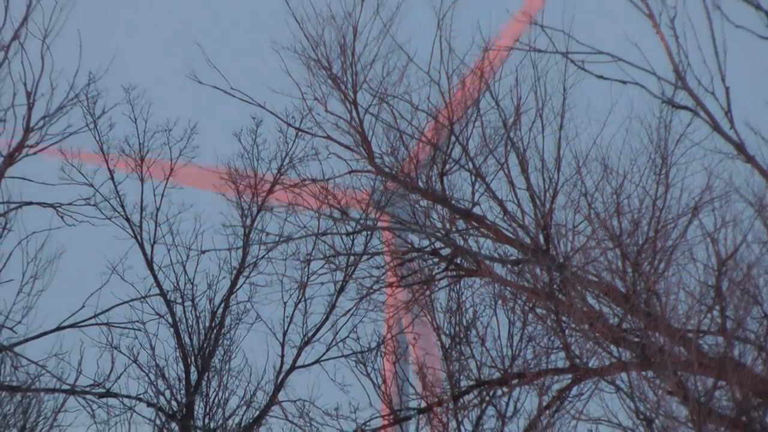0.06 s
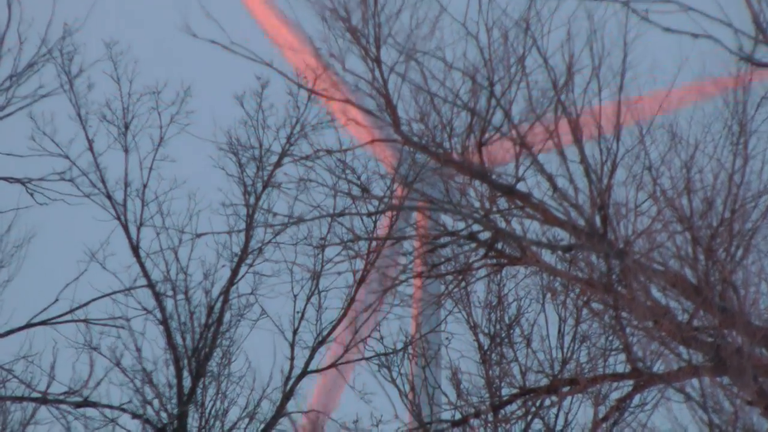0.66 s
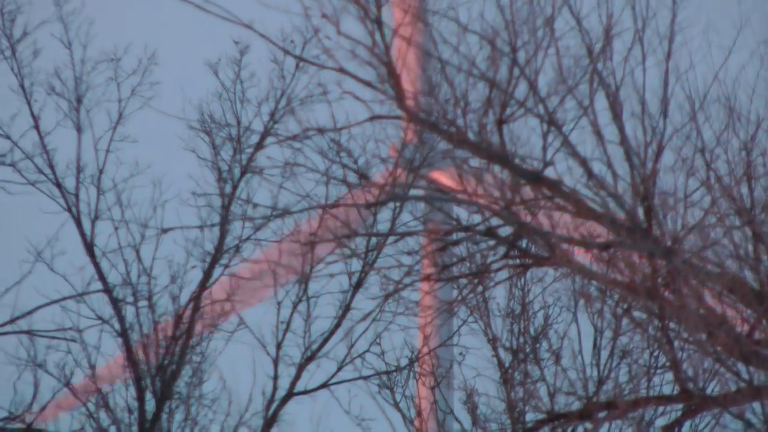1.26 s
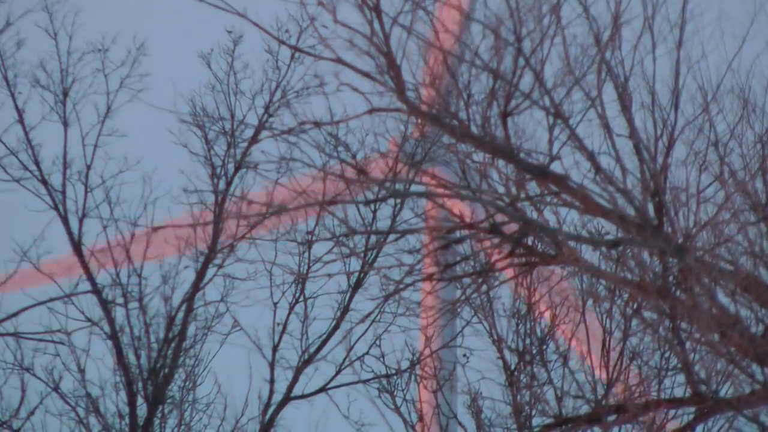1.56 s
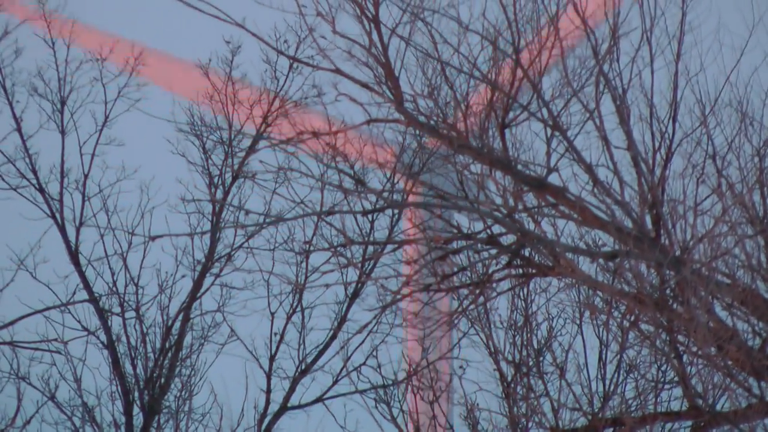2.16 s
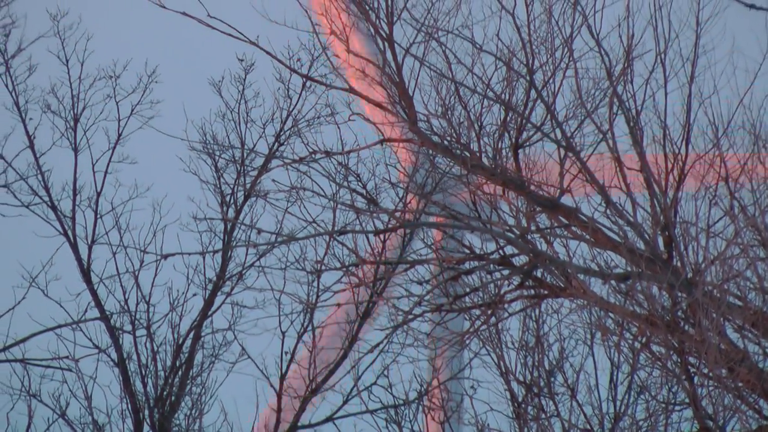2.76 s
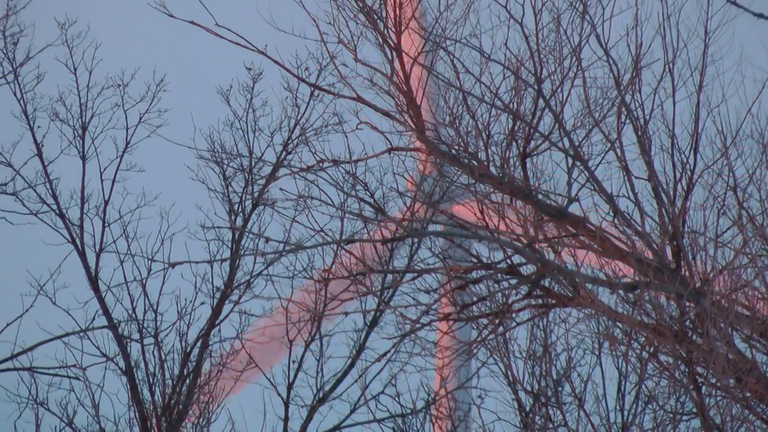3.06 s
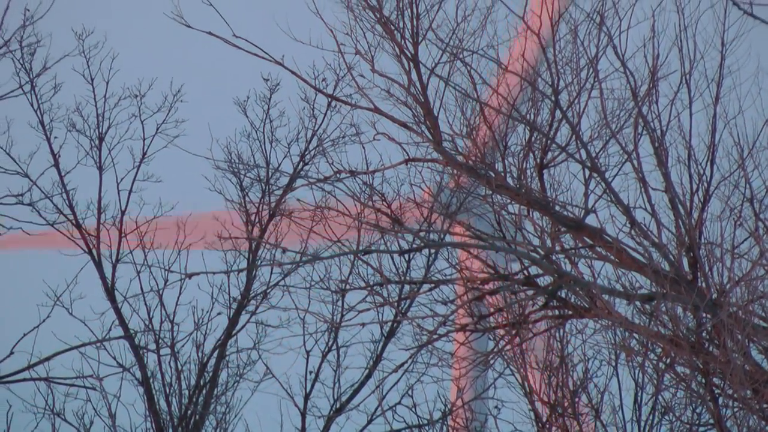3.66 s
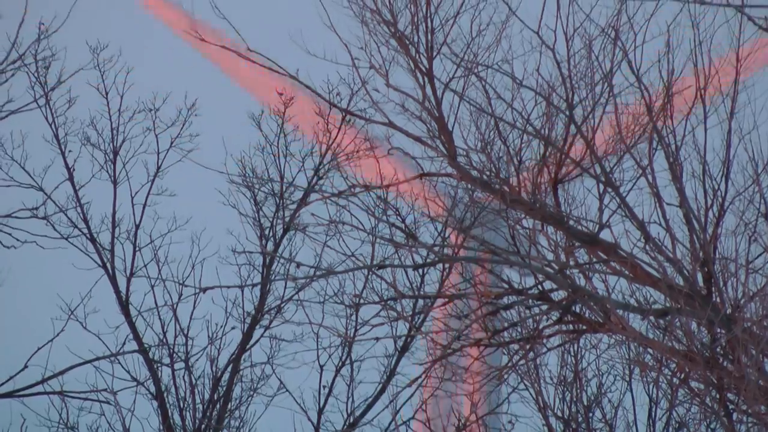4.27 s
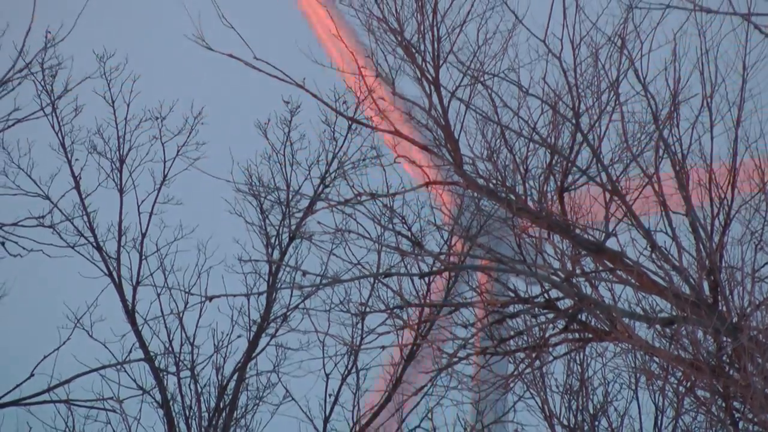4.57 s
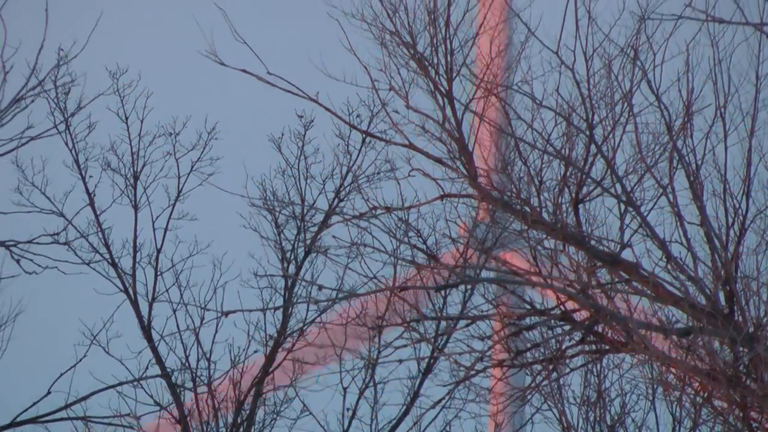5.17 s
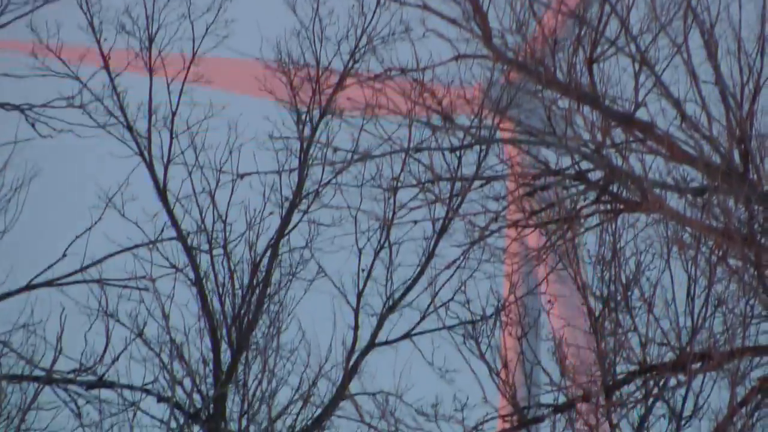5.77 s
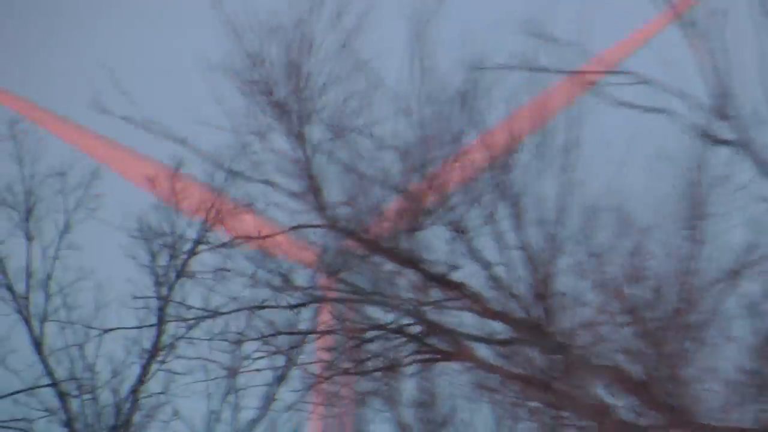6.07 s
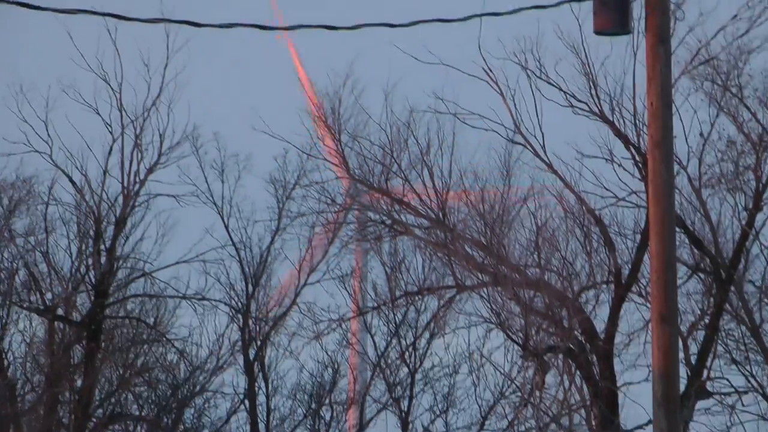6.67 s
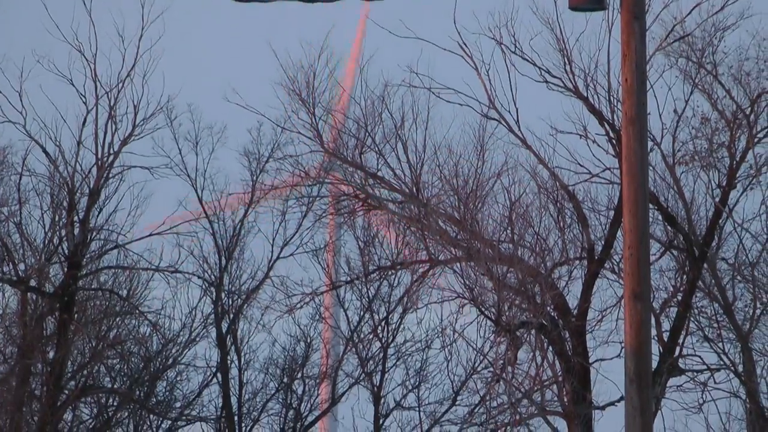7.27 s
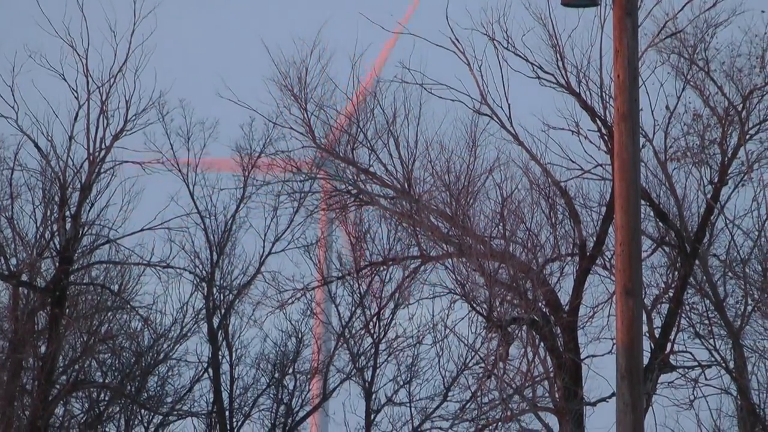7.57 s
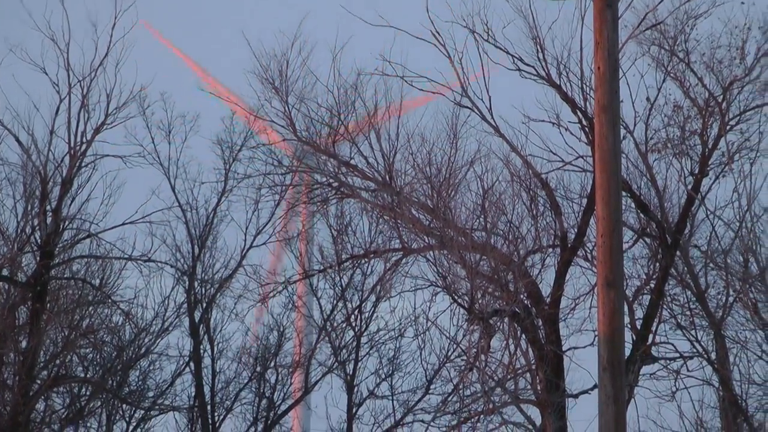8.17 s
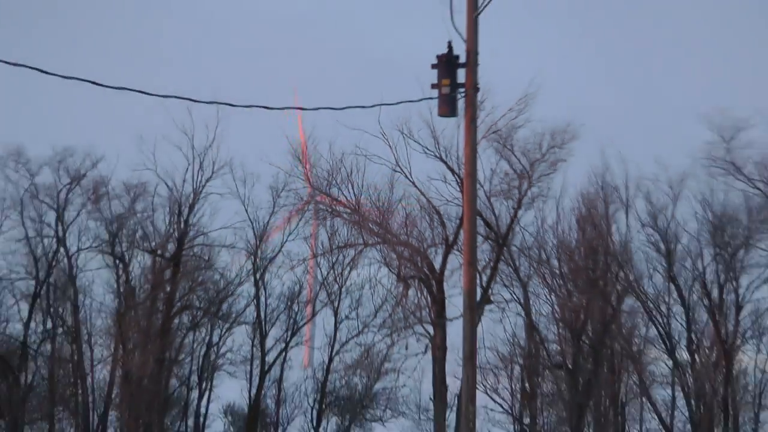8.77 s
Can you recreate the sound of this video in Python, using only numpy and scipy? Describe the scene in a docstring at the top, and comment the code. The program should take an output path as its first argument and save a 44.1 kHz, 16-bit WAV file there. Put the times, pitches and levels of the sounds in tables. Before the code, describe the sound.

Faint, slow swishes of far turbine blades and a steady rumble, broken by finger knocks, soft thumps and a chattering camera zoom.

```python
"""Outdoors among bare trees on a calm evening, a distant wind turbine turns:
a low rumble, and a rush of air that swells as each blade sweeps down.
Close by, the hand-held camera's motor whines and its microphone hisses. Fingers knock, tick and rub
the case, wind puffs and bumps thump softly, the zoom lever's spring snaps,
and the lens motor chatters as it zooms out."""
import sys
import numpy as np
from scipy import signal
from scipy.fft import rfft, irfft, next_fast_len
from scipy.io import wavfile

SR = 44100
rng = np.random.default_rng(int(sys.argv[2]) if len(sys.argv) > 2 else 0)


def log_audio(samples):
    """Write samples as a 16-bit WAV file to the path given in sys.argv[1]."""
    # one column per channel
    frames = np.atleast_2d(samples).T
    # limit to full scale, then quantise
    limited = np.clip(frames, -1, 1)
    pcm = np.round(limited * 32767).astype(np.int16)
    wavfile.write(sys.argv[1], SR, pcm)


N = 392931
TIME = np.arange(N) / SR
FFT_SIZE = 2 * next_fast_len(N // 2 + 1)
FREQ = np.maximum(np.arange(FFT_SIZE // 2 + 1) * SR / FFT_SIZE, 1)


# one blade after another: (swish level [dB], wash level [dB])
BLADE_PASSES = [(-62, -58.5), (-58.5, -60.5), (-56, -63), (-55, -62.5), (-54.5, -62)]
def blade_sweep(first_s=0.012, period_s=1.879, swish_width_s=0.3, wash_width_s=0.45, wash_delay_s=0.72):
    """Envelope of the rush: each blade swishes down, then trails a broader wash."""
    power = 0
    for k, (swish_db, wash_db) in enumerate(BLADE_PASSES):
        peak_s = first_s + k * period_s
        swish = from_db(swish_db) ** 2 * swell(peak_s, swish_width_s)
        wash = from_db(wash_db) ** 2 * swell(peak_s + wash_delay_s, wash_width_s)
        power = power + swish + wash
    return np.sqrt(power)


# tone of the dark rush of air: (frequency [Hz], relative level [dB])
RUSH_EQ = [(70, -37), (120, -19.5), (190, -2), (280, 1), (390, -1), (490, -12), (570, -13), (760, -33),
           (900, -35), (2000, -46)]
# tone of the rumble bed: (frequency [Hz], relative level [dB])
RUMBLE_EQ = [(20, -52), (45, -26), (70, -14), (105, -2), (125, -3.5), (165, 1.5), (260, -1), (380, -7.5),
             (490, -21), (640, -37), (900, -33.5), (2000, -39)]
def turbine(rumble_db=-60.0, rush_trim_db=1.0, gust_db=0.52):
    """Blades rush through the air over a steady rumble; distance has taken the treble."""
    envelope = blade_sweep() * from_db(rush_trim_db + gust_db * drift(14))
    rush = envelope * noise(at_hz(RUSH_EQ), AIR_STEREO)
    rumble = from_db(rumble_db + gust_db * drift(6.9)) * noise(at_hz(RUMBLE_EQ), AIR_STEREO)
    return rush + rumble


# the two hits of one finger knock: (time [s], strength [dB], contact time [s])
KNOCK_HITS = [(0.7371, -26.5, 0.00056), (0.7399, -11, 0.0018)]
# the boxy ring of the case: (frequency [Hz], gain [dB], 60 dB decay [s])
BODY_MODES = [(262.6, -17.5, 0.15), (298, -4.5, 0.051), (355, -3.5, 0.034), (525, -7, 0.039),
              (708, -13.5, 0.067), (780, -18, 0.041)]
def knock(low_cut_hz=208, tail_db=-46, tail_t60=0.63, right_lag_s=0.00013):
    """A fingertip rings the case, too small for bass; the sound reaches the left microphone first."""
    force = np.zeros(N)
    for s, db, contact_s in KNOCK_HITS:
        push = np.hanning(int(contact_s * SR) + 3)
        add(force, s, from_db(db) * push / push.sum())
    body = sum(from_db(db) * ring(force, hz, t60) for hz, db, t60 in BODY_MODES)
    body = np.array([body, np.interp(TIME - right_lag_s, TIME, body)])
    age = TIME - KNOCK_HITS[-1][0]
    fade = (age > 0) * from_db(tail_db - 60 * np.abs(age) / tail_t60)
    dull_tail = fade * noise(at_hz(RUSH_EQ), AIR_STEREO)
    return low_cut(body + dull_tail, low_cut_hz, order=6)


# nail taps either side of the fingertip's hits: (time [s], strength [dB])
NAIL_TAPS = [(0.7366, -29), (.7418, -42)]
# the shell's bright ring: (frequency [Hz], gain [dB], 60 dB decay [s], left over right [dB])
PLASTIC_MODES = [(1396, -12.5, 0.036, 8), (2010, -12, 0.022, 17), (2400, -13.5, 0.017, 14),
                 (3060, -3, 0.016, 7), (3300, -4, 0.014, 6), (3670, -12, 0.014, 1), (4300, -13, 0.012, 3),
                 (5080, -14, 0.017, 2)]
def nail_snap():
    """The knock's hard edge: a nail strikes the plastic shell, nearer the left microphone."""
    force = np.zeros(N)
    for s, db in NAIL_TAPS:
        add(force, s, from_db([db]))
    return sum((-1) ** k * from_db(db) * pan(pan_db) * ring(force, hz, t60)
               for k, (hz, db, t60, pan_db) in enumerate(PLASTIC_MODES))


# low, soft thumps: (time [s], strength [dB], pitch [Hz])
THUMPS = [(1.585, -53, 55), (2.549, -49, 62), (2.645, -63, 45), (3.343, -46, 568), (5.398, -39, 91),
          (5.4235, -29.5, 102), (5.4225, -28.5, 213), (5.4225, -41, 765), (5.969, -38.5, 148),
          (5.981, -48, 75), (6.48, -55, 68), (6.588, -50, 68), (6.82, -66, 50), (8.284, -46, 170),
          (8.845, -37, 171)]
def low_thumps(decay_cycles=5.7, low_cut_ratio=0.64):
    """Puffs of wind on the microphone and bumps of the case, each dying in a few cycles."""
    out, age = np.zeros(N), TIME[:SR // 2]
    for s, db, hz in THUMPS:
        phase = 2 * np.pi * hz * age
        attack = 1 - np.exp(-phase)
        decay = from_db(db - 60 * age * hz / decay_cycles)
        add(out, s, low_cut(np.sin(phase) * attack * decay, low_cut_ratio * hz, order=3))
    return out


# ticks on the case: (time [s], level [dB], 60 dB decay [s], treble tilt [dB/octave],
# resonance [Hz], left over right [dB])
TICKS = [(0.3206, -48, 0.025, 1.5, 4640, 6), (.7378, -38, 0.027, -0.5, 3220, 12.5),
         (1.5062, -52.5, 0.036, 2.5, 2600, -3), (1.514, -52.5, 0.022, 0, 2700, -1),
         (3.342, -56, 0.024, -5, 2800, 1), (5.4005, -53, 0.017, 6, 3400, -3),
         (5.4217, -42.5, 0.037, -11, 1100, -9), (5.425, -51, 0.016, 9, 780, 7),
         (6.553, -53, 0.025, 4, 2600, -1)]
# tone of a tick: (frequency [Hz], relative level [dB])
TICK_EQ = [(300, -1), (740, 5), (950, -3), (1400, -2), (2000, 1.5), (2700, -3), (3900, -1.5), (5300, -8),
           (6500, -14), (10000, -14), (12800, -20.5), (16000, -32)]
def finger_ticks(ring_db=9):
    """Fingers tick against plastic: tight cracks of noise that die at once."""
    out = np.zeros((2, N))
    for s, db, t60, tilt_db, hz, pan_db in TICKS:
        age, crack = case_noise(TICK_EQ, tilt_db, hz, ring_db, pan_db)
        add(out, s, crack * from_db(db - 60 * age / t60))
    return out


# finger slides: (time [s], length [s], level [dB], treble tilt [dB/octave], resonance [Hz])
SLIDES = [(0.317, 0.027, -57.5, -1, 1900), (0.336, 0.055, -69.5, -1, 2000), (1.466, 0.065, -68.5, -1, 2600),
          (5.4, 0.027, -58, 0.5, 1900), (5.565, 0.04, -69, -8, 2400), (5.876, 0.11, -61.5, 3.5, 2200),
          (5.941, 0.042, -55, -4.5, 5200), (6.541, 0.073, -62.5, 1.5, 2620),
          (8.096, 0.029, -60.5, -4.5, 2470), (8.209, 0.078, -58, 2.5, 2400), (8.286, 0.043, -66, 0, 2600),
          (8.78, 0.094, -65, 1, 2680)]
# tone of skin on plastic: (frequency [Hz], relative level [dB])
SLIDE_EQ = [(200, -21), (1100, -7), (1700, -1), (2300, 5), (2900, 2.5), (3600, -4.5), (5200, -4),
            (7000, -8), (10800, -13.5), (12900, -8), (14200, -17), (16000, -18.5)]
def finger_rubs(grain_db=2.0, pressure_curve=0.29, ring_db=4, pan_db=-1.2):
    """Skin slides on the case: a grainy hiss that swells with the pressure."""
    friction = np.zeros((2, N))
    for s, length, db, tilt_db, hz in SLIDES:
        age, hiss = case_noise(SLIDE_EQ, tilt_db, hz, ring_db, pan_db)
        pressure = (age < length) * np.abs(np.sin(np.pi * age / length)) ** pressure_curve
        add(friction, s, hiss * pressure * from_db(db))
    return friction * from_db(grain_db * drift(400))


# lever clicks: (time [s], strength [dB])
LEVER_CLICKS = [(5.082, -41.5), (5.9675, -37), (8.2818, -42.5), (8.6798, -54)]
# the ping of the switch spring: (frequency [Hz], gain [dB], 60 dB decay [s])
SPRING_MODES = [(1680, -24, 0.043), (2440, -0.5, 0.0054), (3030, -7, 0.008), (5300, -4.5, 0.0071)]
def zoom_lever(travel_s=0.000845, muffle_hz=6500, pan_db=-2):
    """The switch spring flips and lands, ringing both times: a dry snap, softened by the case."""
    force = np.zeros(N)
    for s, db in LEVER_CLICKS:
        for delay in (0, travel_s):
            add(force, s + delay, from_db([db]))
    snap = sum(from_db(db) * ring(force, hz, t60) for hz, db, t60 in SPRING_MODES)
    snap = low_cut(snap, hz=1210, order=2)
    muffle = signal.butter(2, muffle_hz, fs=SR, output="sos")
    return signal.sosfilt(muffle, snap) * pan(pan_db)


# a fast zoom, then a slow, quieter one: (start [s], end [s], level [dB])
ZOOM_MOVES = [(6.06, 6.63, -67.5), (8.3, 8.902, -72.5)]
# the motor's chatter: (time [s], level [dB])
MOTOR_SPURTS = [(6.137, -60), (6.171, -56), (6.221, -54.5), (6.253, -57), (6.27, -53.5), (6.304, -54),
                (6.32, -55.5), (6.354, -53.5), (6.387, -57.5), (6.421, -56), (6.456, -57)]
# the barrel's resonances: (frequency [Hz], width [Hz], relative level [dB])
BARREL_PEAKS = [(660, 160, 2), (1050, 130, -6.5), (1414, 110, -0.5), (1780, 150, -2), (2110, 260, -1.5),
                (2430, 97, -4), (2770, 200, -4), (3430, 1400, -4.5), (11500, 8100, -9)]
# the gears' thin singing: (frequency [Hz], width [Hz], relative level [dB])
GEAR_PEAKS = [(5300, 450, -14), (6640, 590, -4), (10700, 700, -3), (13000, 700, -3)]
def lens_zoom(ramp_s=0.066, spurt_width_s=0.0039, sing_trim_db=-11):
    """The gears whirr and sing while zooming; short spurts of the motor rattle the barrel."""
    running = 0
    for start, end, db in ZOOM_MOVES:
        inside_s = np.minimum(TIME - start, end - TIME)
        running = running + from_db(db) * np.clip(inside_s / ramp_s + .5, 0, 1)
    effort = running
    for s, db in MOTOR_SPURTS:
        spurt = np.exp(-.5 * np.minimum(((TIME - s) / spurt_width_s) ** 2, 100))
        effort = np.maximum(effort, from_db(db) * spurt)
    singing = running * from_db(sing_trim_db) * noise(resonances(GEAR_PEAKS), CASE_STEREO)
    rattle = effort * noise(resonances(BARREL_PEAKS), CASE_STEREO)
    return rattle + singing


# the whine: (harmonic [number], left level [dB], right level [dB], right lag [rad])
WHINE_PARTIALS = [(5, -77, -75.5, 0.25), (6, -81, -74, 1.89), (9, -81.5, -80.5, 1.53),
                  (12, -76, -81.5, 0.85)]
# the humming case: (frequency [Hz], width [Hz], relative level [dB])
HUM_PEAKS = [(571, 43, -73), (720, 63, -74.5), (813, 44, -80), (1064, 85, -82.5), (1422, 67, -81.5),
             (1830, 100, -80.5), (2710, 42, -83)]
def drive_motor(speed_hz=136.38, wow=0.00029, waver_db=0.43, hum_db=-70.5):
    """The camera's motor whines thinly while its bearing noise hums in the case resonances."""
    phase = 2 * np.pi * np.cumsum(speed_hz * (1 + wow * drift(4.95))) / SR
    whine = 0
    for harmonic, left_db, right_db, lag in WHINE_PARTIALS:
        left = from_db(left_db) * np.sin(harmonic * phase)
        right = from_db(right_db) * np.sin(harmonic * phase - lag)
        whine = whine + np.sqrt(2) * np.array([left, right]) * from_db(waver_db * drift(8))
    return whine + from_db(hum_db) * noise(resonances(HUM_PEAKS), CASE_STEREO)


# tone of the noise floor: (frequency [Hz], relative level [dB])
HISS_EQ = [(100, -1), (900, -5.5), (1550, -4.5), (1720, 4.5), (2300, 2), (4000, -0.5), (7000, -4),
           (11000, -6), (12600, -5.5), (15800, -9.5)]
def microphone_hiss(level_db=-69.5):
    """The microphone's own steady hiss."""
    return from_db(level_db) * noise(at_hz(HISS_EQ), CASE_STEREO)


# tone of the low breath of air: (frequency [Hz], relative level [dB])
BREATH_EQ = [(15, -20), (45, -0.5), (80, -3), (250, 2), (420, 4), (900, -26), (3000, -41)]
def port_air(level_db=-74):
    """Air brushes each microphone port separately, so the sound is fully wide."""
    return from_db(level_db) * noise(at_hz(BREATH_EQ), stereo=[(1, 0)])


# stereo image of the outdoor air: (frequency [Hz], left-right correlation [0-1])
AIR_STEREO = [(25, 0.11), (60, 0.47), (130, 0.94), (300, 0.97), (550, 0.97), (1000, 0.51)]
# stereo image of the camera's noises: (frequency [Hz], left-right correlation [0-1])
CASE_STEREO = [(200, 0.82), (700, 0.34), (1200, 0.17), (1900, 0.13), (2800, 0.37), (4200, 0.86),
               (8000, 0.89), (13000, 0.18)]
def noise(spectrum_db, stereo, hz=FREQ):
    """Mid-side noise of unit power with a given tone and stereo image."""
    mid, side = rfft(rng.standard_normal((2, 2 * len(hz) - 2)))
    alike = np.clip(at_hz(stereo, hz), -1, 1)
    pair = np.sqrt(1 + alike) * mid + np.sqrt(1 - alike) * side * [[1], [-1]]
    return rms_one(irfft(pair * from_db(spectrum_db)))[:, :N]


def case_noise(eq, tilt_db, ring_hz, ring_db, pan_db, width_octaves=0.18, size=8192):
    """A time axis and a short noise, tilted above 2 kHz and peaked where the touched part rings."""
    hz = np.maximum(np.arange(size // 2 + 1) * SR / size, 1)
    treble = tilt_db * np.log2(np.maximum(hz, 2000) / 2000)
    peak = ring_db / (1 + (np.log2(hz / ring_hz) / width_octaves) ** 2)
    sound = noise(at_hz(eq, hz) + treble + peak, CASE_STEREO, hz)
    return np.arange(size) / SR, sound * pan(pan_db)


def ring(force, hz, t60):
    """Resonator: a unit click starts a decaying sine of height 1."""
    r, w = from_db(-60 / (t60 * SR)), 2 * np.pi * hz / SR
    return signal.lfilter([0, np.sin(w)], [1, -2 * r * np.cos(w), r * r], force + 1e-18)


def resonances(peaks):
    """Spectrum in dB of a bank of resonant peaks."""
    power = sum(from_db(db) ** 2 / width / (1 + 2 * ((FREQ - hz) / width) ** 2) ** 2
                for hz, width, db in peaks)
    return 10 * np.log10(power)


def swell(peak_s, width_s, steepness=2.55):
    """A round-topped rise and fall."""
    return np.exp(-np.abs((TIME - peak_s) / width_s) ** steepness)


def drift(per_s):
    """Random wander of unit power."""
    knots = np.arange(0, TIME[-1] + 1, 1 / per_s)
    return rms_one(np.interp(TIME, knots, rng.standard_normal(len(knots))))


def at_hz(points, hz=FREQ):
    """Draw a curve through points on a log-frequency axis."""
    knots, values = np.transpose(points)
    return np.interp(np.log(hz), np.log(knots), values)


def low_cut(x, hz, order):
    """Roll off the bass."""
    return signal.sosfilt(signal.butter(order, hz, "high", fs=SR, output="sos"), x)


def add(out, s, sound):
    """Mix a short sound in at time s."""
    start = int(np.clip(s * SR, 0, N - 1))
    out[..., start:start + sound.shape[-1]] += sound[..., :N - start]


def pan(db):
    """Stereo gains; positive leans left."""
    return from_db([[db / 2], [-db / 2]])


def from_db(db):
    """Decibels to gain."""
    return 10 ** (np.asarray(db) / 20)


def rms_one(x):
    """Scale to unit power."""
    return x / np.sqrt(np.mean(x ** 2) + 1e-20)


def scene():
    """The mix: the far turbine and the close sounds over a bed of hiss and air."""
    bed = microphone_hiss() + port_air()
    close = drive_motor() + knock() + nail_snap() + finger_ticks() + finger_rubs()
    close += low_thumps() + zoom_lever() + lens_zoom()
    return turbine() * pan(db=-.5) + close + bed


def record(dry, cutoff_hz=15850):
    """A steep high cut takes off the very top."""
    return signal.sosfilt(signal.ellip(12, .1, 80, cutoff_hz, fs=SR, output="sos"), dry)


dry = scene()
out = record(dry)
log_audio(out)
```